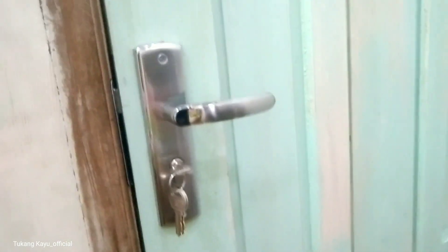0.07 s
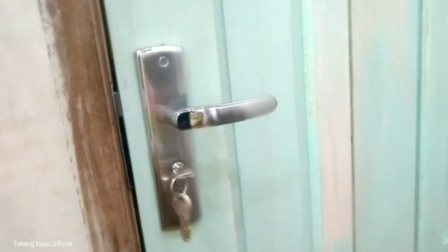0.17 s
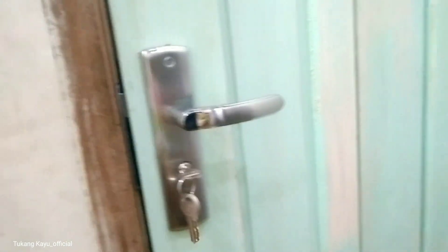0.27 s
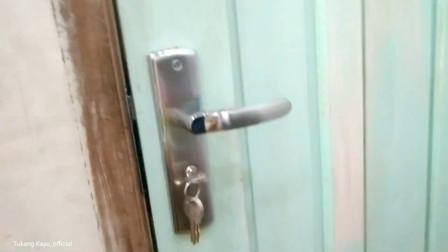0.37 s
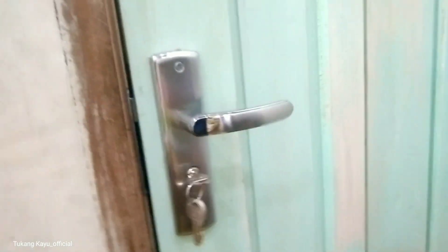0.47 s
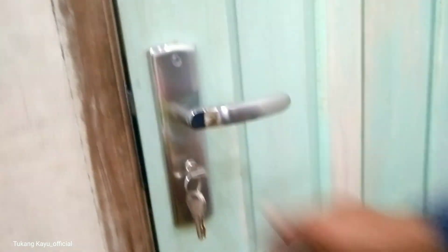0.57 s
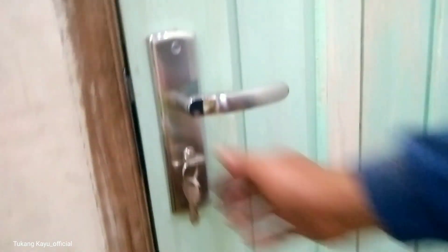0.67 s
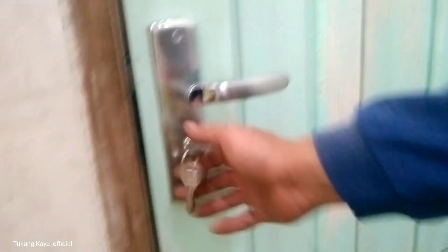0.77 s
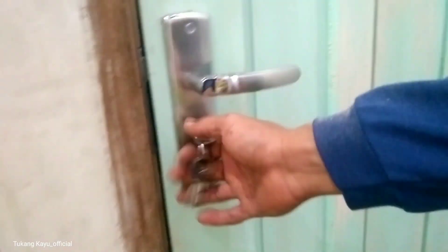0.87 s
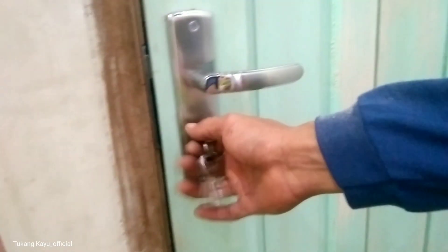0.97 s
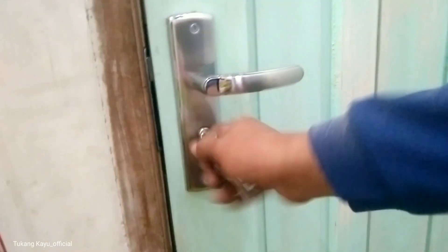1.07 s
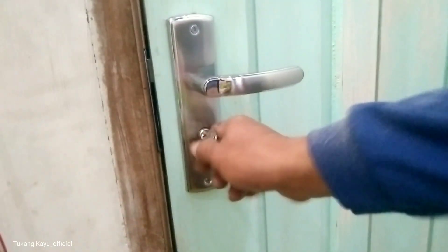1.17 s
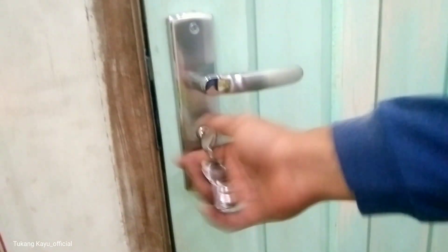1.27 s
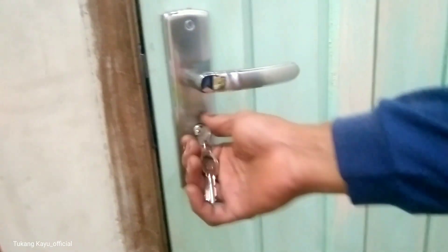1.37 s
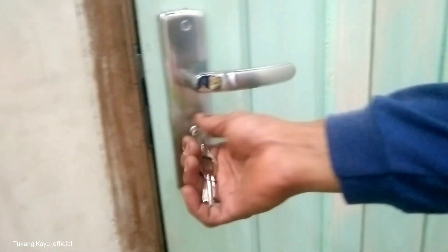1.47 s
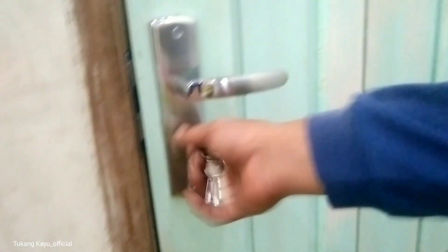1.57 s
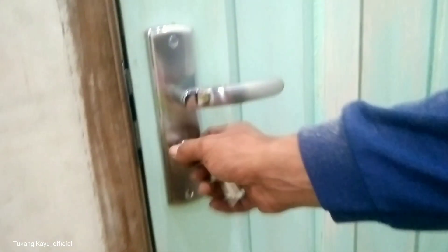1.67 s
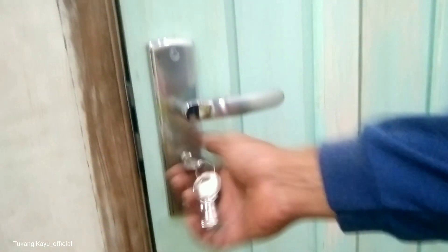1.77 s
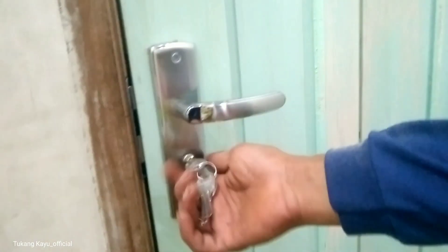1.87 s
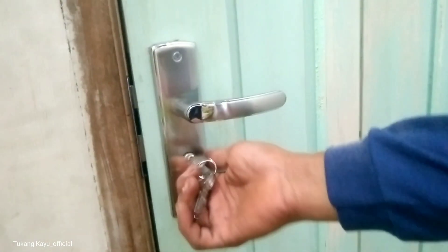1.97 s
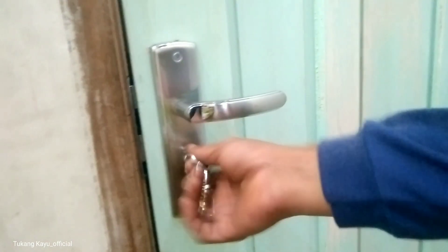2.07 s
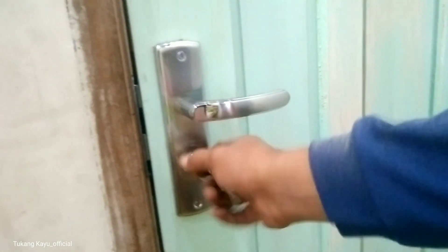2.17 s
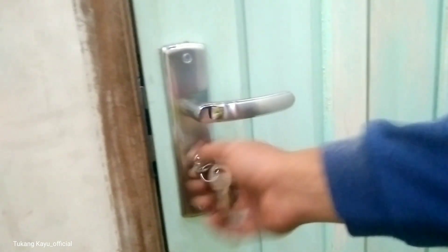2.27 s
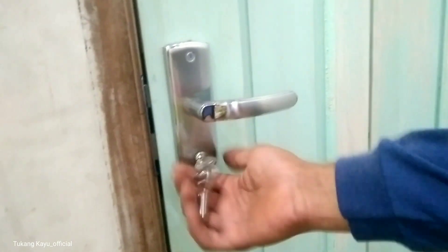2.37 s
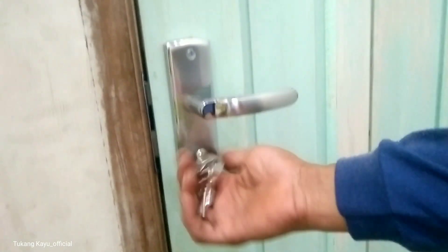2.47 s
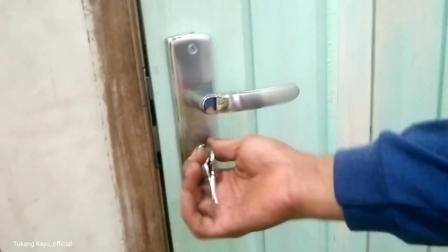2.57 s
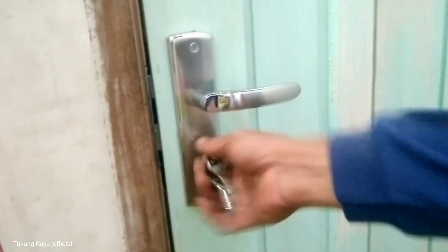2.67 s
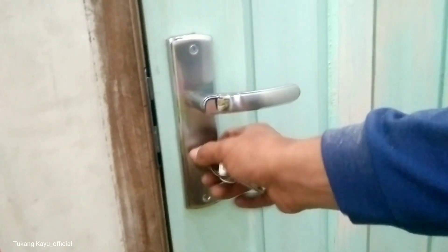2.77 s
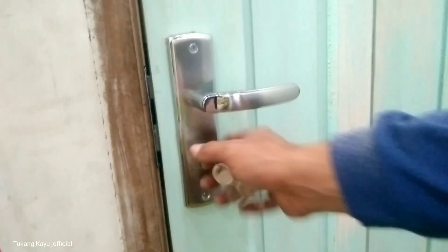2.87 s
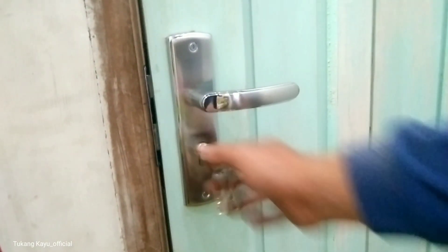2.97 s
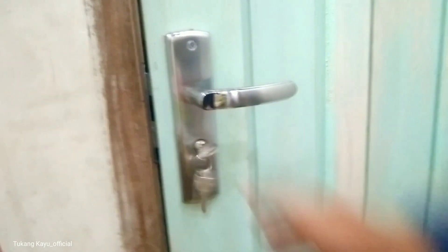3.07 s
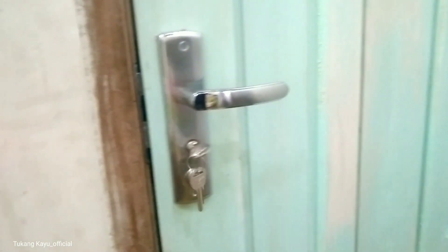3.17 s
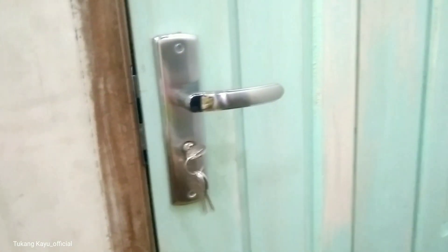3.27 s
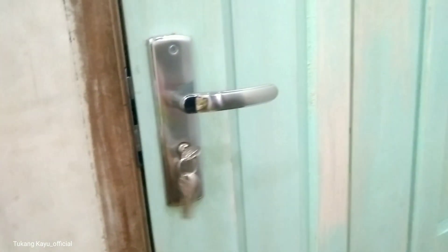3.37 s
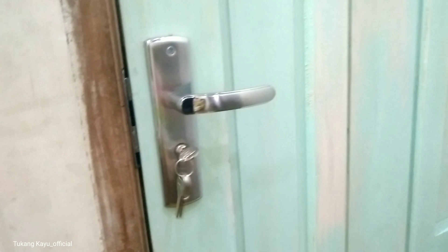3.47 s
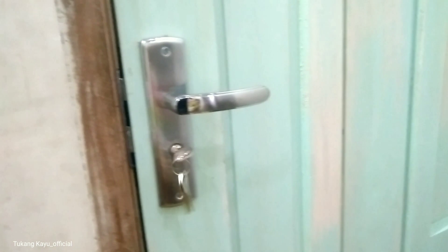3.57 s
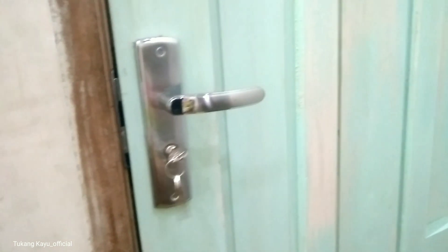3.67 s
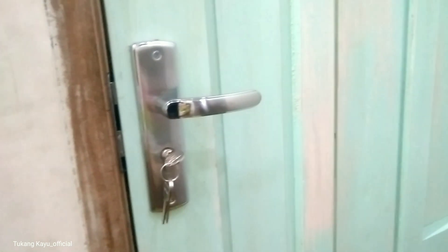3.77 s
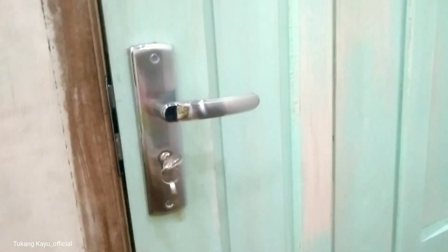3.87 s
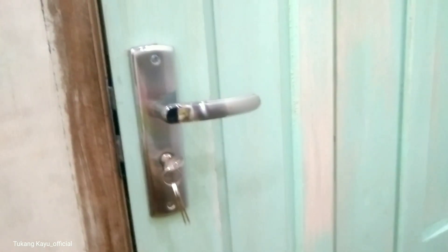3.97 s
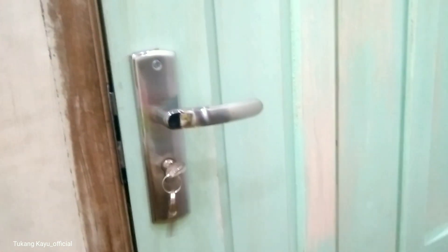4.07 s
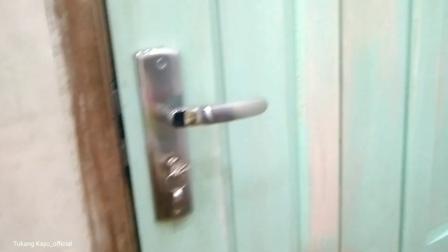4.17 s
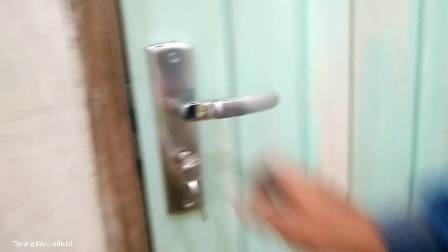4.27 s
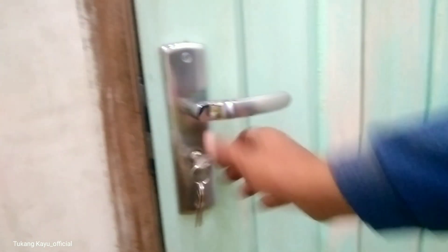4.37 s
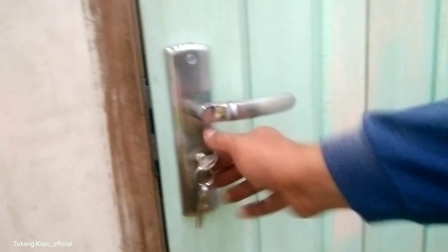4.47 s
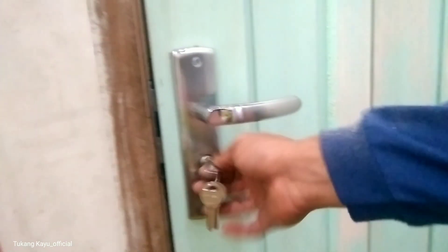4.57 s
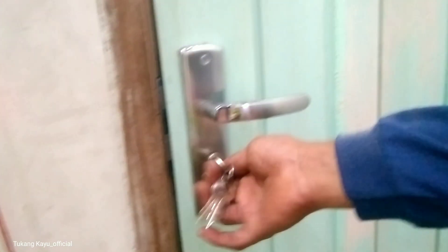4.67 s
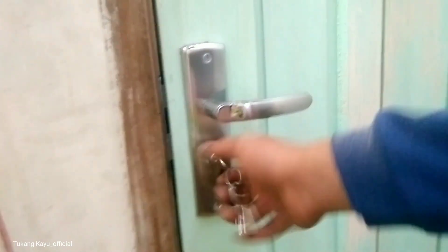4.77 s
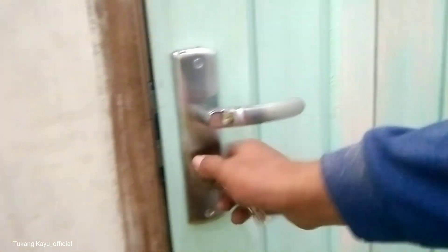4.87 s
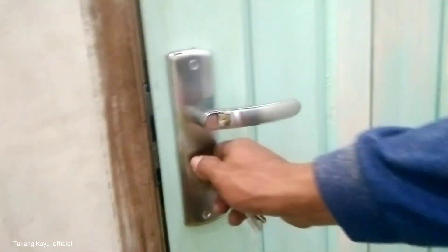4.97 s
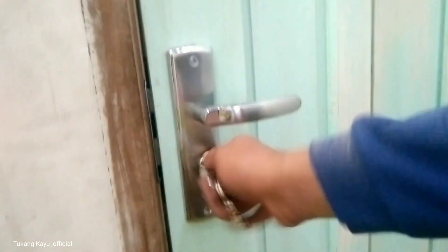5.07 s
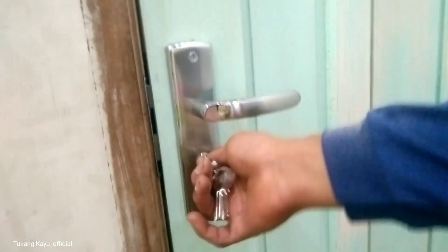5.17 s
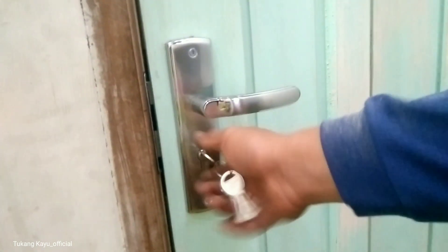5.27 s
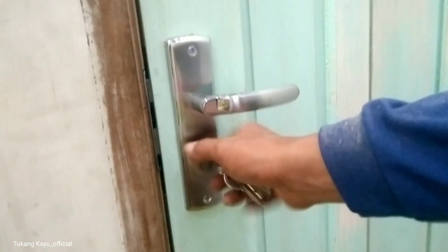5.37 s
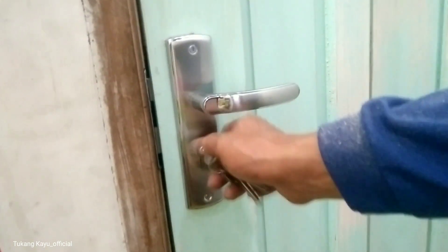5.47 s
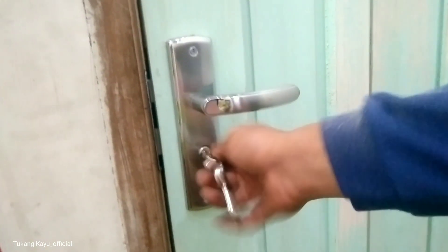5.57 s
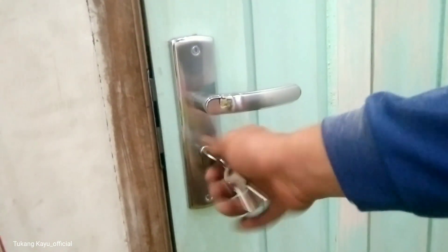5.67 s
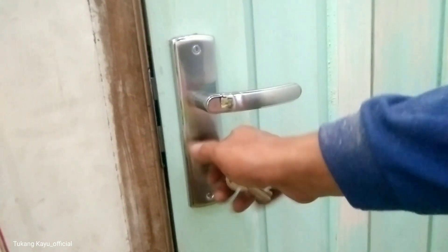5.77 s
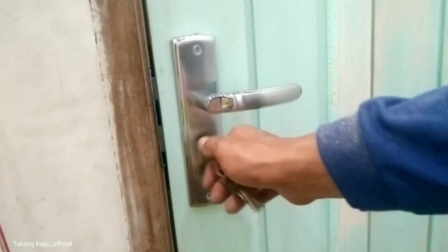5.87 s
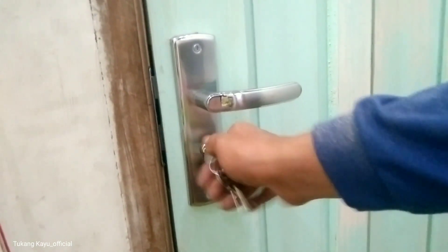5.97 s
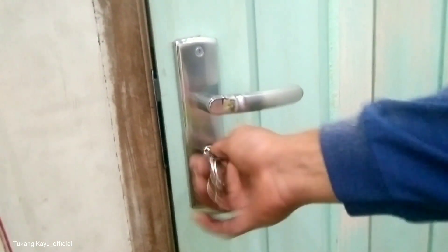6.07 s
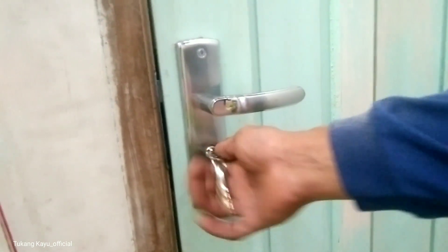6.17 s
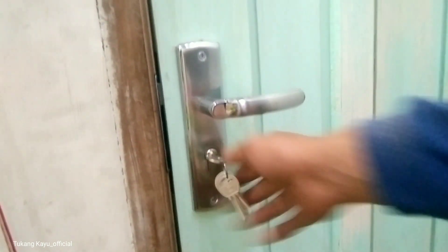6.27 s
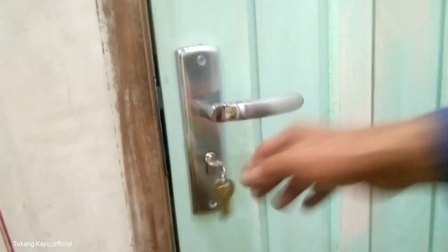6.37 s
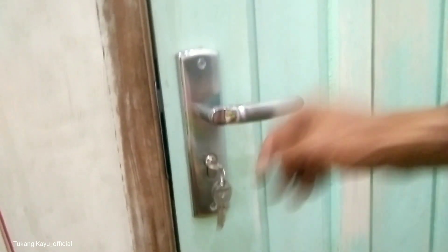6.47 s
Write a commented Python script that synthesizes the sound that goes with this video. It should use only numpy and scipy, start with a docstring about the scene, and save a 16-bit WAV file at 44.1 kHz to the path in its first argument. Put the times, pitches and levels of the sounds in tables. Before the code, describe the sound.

Close metallic clicks and key jingles as a door lock is turned four times, each bolt snapping with a hard clack in a small, echoing room.

```python
"""A low rumble, a wavering hum and a far motor are heard first, in a small hard room.
Close by, a key is turned four times in the lock of a wooden door: small parts tick and scrape as
bursts of tiny contacts, and the bolt snaps over with a resonant clack that thumps two door modes.
The spare keys chink on their ring as families of dying sines. One distant horn toots, a buzz of
harmonics with a narrow rasp."""
import sys
import numpy as np
from scipy import signal
from scipy.fft import rfft, irfft
from scipy.io import wavfile
from scipy.ndimage import uniform_filter1d

SR = 44100
rng = np.random.default_rng(int(sys.argv[2]) if len(sys.argv) > 2 else 0)


def unload_audio(sound):
    """Save the sound as a 16-bit wav file, at the path given as the first command line argument."""
    columns = np.transpose(np.atleast_2d(sound))
    # keep every value between -1 and 1, then stretch to whole-number steps
    steps = np.round(np.clip(columns, -1, 1) * 32767)
    wavfile.write(sys.argv[1], SR, steps.astype(np.int16))


N = 287973  # length in samples


def amp(db):
    """Decibels to gain."""
    return 10 ** (np.asarray(db) / 20)


def evened(x):
    """Scales to rms 1."""
    return x / np.sqrt(np.mean(x ** 2) + 1e-20)


def crested(x, size=160):
    """Scales so that the loudest few milliseconds have rms 1."""
    return x / np.sqrt(uniform_filter1d(x ** 2, size).max() + 1e-20)


def read(points, hz):
    """Reads a table on a log-frequency axis."""
    f, value = np.transpose(points)
    return np.interp(np.log(hz + 1), np.log(f), value)


def add(mix, s, sound):
    """Mixes a sound in at time s."""
    part = mix[max(round(s * SR), 0):][:len(sound)]
    part += sound[:len(part)]


def sine(hz, t):
    """A steady sine."""
    return np.sin(2 * np.pi * hz * t)


def phase(hz):
    """Phase of a tone whose pitch moves, in radians."""
    return 2 * np.pi * np.cumsum(hz) / SR


def band(x, hz, kind, order=4):
    """Low-pass or high-pass."""
    return signal.sosfilt(signal.butter(order, min(hz, SR / 2.1), kind, fs=SR, output="sos"), x)


def colour(x, points, size=2048):
    """Causal minimum-phase filter with the given spectrum, made by folding its cepstrum."""
    gain = amp(read(points, np.fft.rfftfreq(size, 1 / SR)))
    cepstrum = irfft(np.log(gain))
    cepstrum[1:size // 2] *= 2
    cepstrum[size // 2 + 1:] = 0
    response = irfft(np.exp(rfft(cepstrum)))
    return signal.fftconvolve(x, response)[:len(x)]


def drift(rate_hz):
    """Slow random motion of rms 1."""
    count = int(2 * rate_hz * N / SR) + 4
    return evened(np.interp(np.arange(N), np.linspace(0, N, count), rng.standard_normal(count)))


def patchy(x, spread_db=2.0):
    """Lets the level of each region of a noise, in time and pitch, wander on its own."""
    z = signal.stft(x, nperseg=1024)[2]
    patches = uniform_filter1d(rng.standard_normal(z.shape), size=4, axis=0)
    patches = evened(uniform_filter1d(patches, size=14, axis=1))
    return signal.istft(z * amp(spread_db * patches), nperseg=1024)[1][:N]


def ring(modes, t, scatter_db=0, damping=1, detune=0):
    """Dying sines; each blow can weight and bend them a little differently."""
    hz, db, t60 = np.transpose(modes)[:, :, None]
    level = amp(db + scatter_db * rng.standard_normal(hz.shape) - 60 * t * damping / t60)
    hz = hz * (1 + detune * rng.standard_normal(hz.shape))
    start_cycles = rng.random(hz.shape)
    return (level * np.sin(2 * np.pi * (hz * t + start_cycles))).sum(0)


def resonant(x, *peaks):
    """Lifts each resonance (Hz, width Hz, dB) out of a sound and lets it ring."""
    for hz, width, db in peaks:
        b, a = signal.iirpeak(hz, hz / width, SR)
        x = x + (amp(db) - 1) * signal.lfilter(b, a, x)
    return x


def own_colour(x, spread_db=3.5, count=14):
    """Every small part has random resonances of its own."""
    hz, db = np.geomspace(500, 14000, count), spread_db * rng.standard_normal(count)
    return colour(x, np.column_stack([hz, db]), size=512)


def chatter(t, decay_s, rise_s=0.00059):
    """Metal meets metal in a quickly dying burst of tiny contacts, with an even spectrum."""
    envelope = np.exp(-t / max(decay_s, .0005)) * (1 - np.exp(-t / rise_s))
    z = rfft(rng.standard_normal(len(t)) * envelope)
    flat = irfft(z / (abs(z) + 1e-12), len(t))
    return evened(flat * envelope ** (1 / 4))  # the flattened burst needs only a mild gate


def slips(size, per_s, spread_db):
    """A random train of tiny catches, a few of them strong if the spread is above zero."""
    chance, strength, sign = rng.random((3, size))
    caught = chance < per_s / SR
    return caught * np.sign(sign - .5) * amp(spread_db * np.minimum(-np.log(strength + 1e-9), 3))


# Spectrum of the lock case and plate.
# Each row: frequency in Hz, filter gain in dB.
CASE_SPECTRUM = [(100, -18.5), (200, 5), (450, 5), (800, 6), (1300, 5), (1900, 6), (3000, 0), (4200, -7.5),
                 (5000, -11), (6000, -9), (7200, -12), (9300, -5.5), (12000, -15), (16000, -24.5)]


def through_case(force, body_db, bite_db, treble_db, scale):
    """Heavy parts give the body of the sound, the plate its bite, the light parts its treble."""
    sound = colour(force, CASE_SPECTRUM)
    upper = band(sound, 2594, "high")
    body, bite, treble = band(sound, 3200, "low"), band(upper, 5260, "low"), band(upper, 5210, "high")
    return amp(body_db) * scale(body) + amp(bite_db) * scale(bite) + amp(treble_db) * scale(treble)


def crack(t, decay_s):
    """The very first hard contact, over in a millisecond or two."""
    contact = colour(chatter(t, decay_s, rise_s=.0002), CASE_SPECTRUM)
    return crested(band(contact, 4500, "high", order=2))


# What plate, handle and springs ring with.
# Each row: frequency in Hz, relative level in dB, t60 in seconds.
CASE_RINGING = [(705.4, 2, 0.2), (832, 0.5, 0.11), (1219, 6.5, 0.12), (1643, -4.5, 0.45), (1780, -1.5, 0.2),
                (1950, -9, 0.25), (2040, -11.5, 0.26), (2212, -18.5, .3), (2520, -8, 0.33),
                (2860, -8.5, 0.3), (3180, -7, 0.26), (3760, -6.5, 0.15), (3830, -4.5, 0.15),
                (5600, -2, 0.1), (8550, 8, 0.05), (9894, 0, 0.099)]


def case_ring(x):
    """Plate, handle and springs ring on faintly after every contact."""
    tail = ring(CASE_RINGING, np.arange(SR // 2) / SR)
    return x + amp(-19) * signal.fftconvolve(x, tail / np.linalg.norm(tail))[:N]


# Reverberation of the small hard room.
# Each row: frequency in Hz, t60 in seconds.
ROOM_DECAY = [(100, 1), (300, 0.9), (800, 0.88), (2000, 0.66), (4500, 0.59), (9000, 0.48), (15000, 0.41)]


def room(x, wet_db=-4, early_db=-6, early_decay_s=0.015):
    """Dense early echoes off door and frame, then a tail that dies band by band."""
    t = np.arange(SR) / SR
    taps = rng.choice([-1., 1.], SR) * (rng.random(SR) < 5000 / SR)  # 5000 echoes a second
    taps = taps * np.clip((t - .004) / 0.0037, 0, 1)
    hz, at, z = signal.stft(taps, SR, nperseg=256)
    fade = amp(-60 * at / read(ROOM_DECAY, hz)[:, None])
    tail = signal.istft(z * fade, SR, nperseg=256)[1][:SR]
    early = rng.permutation(taps) * np.exp(-t / early_decay_s) * (t > .003)
    echoes = amp(wet_db) * tail / np.linalg.norm(tail) + amp(early_db) * early / np.linalg.norm(early)
    return x + signal.fftconvolve(x, echoes)[:N]


# Spectrum of the background rumble.
# Each row: frequency in Hz, filter gain in dB.
RUMBLE_SPECTRUM = [(20, -33), (48, -25), (63, 0), (90, -3), (125, -5), (180, 0), (250, -7), (350, -7),
                   (450, -12), (700, -14), (1150, -22), (1400, -32), (1650, -48), (2300, -54), (16000, -58)]


def rumble(start_db=-59, swell_db=-0.97, ebb_db_per_s=0.5):
    """Low coloured noise with a patchy, unsteady level that slowly ebbs."""
    t = np.arange(N) / SR
    noise = colour(rng.standard_normal(N), RUMBLE_SPECTRUM, size=8192)
    return evened(patchy(noise)) * amp(start_db - ebb_db_per_s * t + swell_db * drift(5.3))


# Hum tones in the room; pitch and level waver about these values.
# Each row: frequency in Hz, level in dB.
HUM_TONES = [(109, -71), (186, -70.5), (306, -66), (371, -75.5), (549, -75.5)]


def hum():
    """A few sines, each wavering in level and pitch."""
    out = np.zeros(N)
    for hz, db in HUM_TONES:
        level_db = db + 1.6 * drift(2.4)
        out += amp(level_db) * np.sin(phase(hz + 2.3 * drift(6.6)))
    return out


# The far motor swells, slows and dies away; pitch and level waver about this path.
# Each row: time in seconds, pitch in Hz, level of the lowest tone in dB.
MOTOR_PATH = [(0, 193.5, -59.5), (0.568, 193, -61), (.68, 194.3, -53), (1, 187.9, -55), (1.799, 182.2, -59),
              (2.251, 177.8, -57.5)]
MOTOR_FADE_DB_PER_S = 32  # after the last row


def motor():
    """A drone of three locked sines that follows the motor's falling speed."""
    t = np.arange(N) / SR
    s, hz, db = np.transpose(MOTOR_PATH)
    angle = phase(np.interp(t, s, hz) + 2.2 * drift(15))
    fade_db = MOTOR_FADE_DB_PER_S * np.maximum(t - s[-1], 0)
    level_db = np.interp(t, s, db) - fade_db + 0.87 * drift(2.6)
    drone = np.sin(angle) + amp(-17) * np.sin(2 * angle) + amp(-14) * np.sin(2.86 * angle)
    return amp(level_db) * drone


# Clicks of pins, cam and spring.
# Each row: start in seconds, base level in dB (each band is offset from it),
# brightness as dB of treble over body, ring in Hz, high zing in Hz.
CLICK_EVENTS = [(0.996, -58, 11, 1850, 5660), (1.079, -49, 2.5, 2640, 11000),
                (1.144, -49.5, -13, 3060, 10840), (1.276, -40.5, 1, 2740, 5900),
                (1.348, -49.5, -2.5, 2670, 9900), (1.3643, -35.5, 11.5, 1740, 9860),
                (1.458, -52, -17, 1880, 5700), (1.511, -56, 4, 2900, 8600), (1.551, -54, -4, 2700, 5700),
                (1.633, -40, -6, 1800, 6060), (1.645, -50, -7, 1810, 8400), (1.725, -48, 8, 2900, 9500),
                (1.73, -40, 1, 3200, 8600), (1.754, -29.5, 12, 2900, 8600), (1.759, -30, -4, 3000, 8550),
                (1.797, -32.5, -9, 2010, 9800), (2.278, -29.5, 1, 2530, 7270),
                (2.301, -42, -17, 2430, 8600), (2.399, -47, -14, 2520, 8550), (2.526, -52, -11, 3040, 5650),
                (2.54, -40.5, -6, 3040, 5690), (2.56, -66, -24, 3040, 7050), (2.615, -49, -4, 1930, 7130),
                (2.628, -43.5, -17, 1940, 6090), (2.766, -37, -15, 1800, 10800),
                (2.811, -35.5, 3.5, 1910, 7040), (2.846, -43.5, -6, 3660, 8590),
                (2.884, -34, 3, 2990, 8800), (2.892, -33.5, -5, 2900, 5600), (2.919, -32, -6, 2790, 8700),
                (3.231, -41.5, -9, 1780, 5730), (3.311, -42, -18, 2870, 7300),
                (4.744, -43.5, -8, 2600, 6160), (4.797, -40, -11.5, 1850, 6070),
                (4.923, -49.5, -17, 2570, 8550), (5.14, -50, -13, 1820, 8550),
                (5.193, -60, -22, 1750, 7080), (5.273, -34, -1, 2870, 5600), (5.35, -28.5, -8, 2680, 8540),
                (5.711, -48, -5, 1900, 8600), (5.732, -38.5, 2, 3120, 8500), (5.756, -37, -9, 2380, 8630),
                (6.034, -45.5, -19, 1750, 5770), (6.086, -37.5, -5, 1750, 8700),
                (6.098, -36, -5, 1680, 8800), (6.105, -54, -11, 3050, 8800), (6.148, -39.5, -8, 3100, 9600),
                (6.192, -37.5, -8, 1900, 8200), (6.203, -53, -14, 1920, 8400), (6.239, -38, 15, 4000, 5900),
                (6.266, -40, -13, 2220, 5990), (6.277, -32, -14, 2450, 8550)]
CLICK_DECAY_S = 0.0053


def clicks(body_db=-11, bite_db=-7.5, edge_db=-11, crack_db=-13, crack_gain=0.62):
    """Small parts drop into place, each with its own ring; the lighter, the more treble and less body."""
    out, t = np.zeros(N), np.arange(4096) / SR
    for s, db, bright, ring_hz, zing_hz in CLICK_EVENTS:
        force = own_colour(chatter(t, CLICK_DECAY_S, rise_s=0.002), spread_db=5.0)
        force = resonant(force, (ring_hz, 220, 6), (zing_hz, 300, 9))
        body, edge = db + body_db - bright / 2, db + edge_db + bright / 2
        add(out, s, through_case(force, body, db + bite_db, edge, crested))
        add(out, s, amp(db + crack_db + crack_gain * bright) * crack(t, .001))
    return out


# What the key blades ring with.
# Each row: frequency in Hz, relative level in dB, t60 in seconds at damping 1.
KEY_RINGING = [(2620, -9, .18), (6070, 0, .36), (6990, -9, .12), (7090, -4, .18), (7185, 0, .15),
               (7310, -5, .14), (7400, -11, .12), (8590, -16, .1), (9230, -18, .1), (10290, -6, .16),
               (10370, -4, .16), (10505, -1, .19), (10730, -9, .18), (10835, -8, .2), (11770, -3, .2),
               (11890, -3, .16), (11990, -2, .16), (12090, -1, .15), (15420, -13, .18)]
# Borders between the low, middle, high and top family of those modes, in Hz.
FAMILY_BORDERS = [6500, 8000, 11300]
# The keys chink.
# Each row: start in seconds, level in dB of the low, middle, high and top family (four columns),
# edge tick in dB, decay of the contact in seconds,
# damping (1 hanging free, more when muted by the hand; below 0.6 it counts as 0.6).
CHINK_EVENTS = [(1.0706, -59.5, -55, -50.5, -50, -45, 0.0017, 0.52),
                (1.186, -62.5, -53, -74, -72, -52.5, 0.012, 1.1),
                (2.153, -78, -69, -75, -75, -52, .002, 1.9), (2.175, -53, -33.5, -47, -47, -40, .0047, 2.2),
                (2.3373, -77, -51, -72, -56, -53, .002, 2.3),
                (2.716, -59, -38.5, -56, -47, -57, .002, 0.84),
                (2.738, -62, -49, -45, -40, -38.5, 0.002, 4.6),
                (2.807, -49, -39.5, -53, -57, -38.5, 0.0026, 2.3),
                (2.8388, -60, -49, -48, -43, -43, .0013, 5),
                (3.1764, -52.5, -50, -49, -40, -42, 0.0032, 1.6),
                (3.425, -76.5, -66, -66, -52.5, -60, 0.0025, 3.2),
                (3.5218, -58, -54, -50, -48, -50, 0.0016, 2.2),
                (4.826, -55.5, -50, -40.5, -59, -42.5, 0.0022, 1),
                (4.879, -55, -49, -44, -51, -42, 0.002, 3), (4.8973, -72, -47, -46, -47, -46.5, 0.011, 3.5),
                (4.9241, -56, -57, -53, -59, -45.5, 0.0044, 2.2),
                (5.058, -50, -41, -45, -40, -40.5, 0.0022, 7.5),
                (5.23, -82, -57, -71, -69, -56, 0.0022, 2.5), (5.249, -72, -56, -69, -70, -53, .002, 2.5),
                (5.509, -64, -45.5, -50, -47, -43.5, 0.0044, 4.7),
                (5.656, -78, -70, -56, -51, -70, 0.0018, 2.6),
                (5.7803, -72, -60, -61, -60, -43.5, 0.0083, 6),
                (5.8121, -54, -43, -56, -62, -40, 0.0018, 7.8), (5.827, -69, -56, -64, -59, -41, .0016, 6),
                (5.962, -64, -60, -55, -54, -58, .002, 3.4), (6.017, -75, -52, -65, -67, -65, 0.0025, 4),
                (6.5197, -58, -54, -46, -43, -48, .002, 1.5)]
# one key slides along another just before they chink: seconds ahead, dB re the loudest family
BRUSH_S, BRUSH_DB = 0.0072, -14.5


def keys(low_free_db=-5, free_db=-13, touch_s=0.013, rattle_db=-10, rattle_s=0.016):
    """A chink is a light brush, an edge tick, a brief rattle, and flat blades ringing, partly choked."""
    out, t = np.zeros(N), np.arange(16384) / SR
    modes = np.array(KEY_RINGING)
    family = np.digitize(modes[:, 0], FAMILY_BORDERS)
    edge_spectrum = [(1000, -5.5), (2700, -18), (5000, -20.0), (7000, -12.0),
                     (9000, -6.5), (11000, -4.5), (13000, -15), (15000, -4.0)]  # Hz, dB
    for s, *levels, tick_db, contact_s, damping in CHINK_EVENTS:
        for k, db in enumerate(levels):
            # neighbouring keys choke the blades; the lowest modes escape best
            free = amp(free_db if k else low_free_db)
            choke = (free + np.exp(-t / touch_s)) * (1 - np.exp(-t / 0.0012))
            blades = ring(modes[family == k], t, scatter_db=5, damping=max(damping, .6), detune=.004)
            add(out, s, amp(db) * crested(blades * choke))
        rattle = chatter(t, rattle_s) * rng.exponential(1, len(t))
        contacts = chatter(t, contact_s, rise_s=0.00084) + amp(rattle_db) * rattle
        add(out, s, amp(tick_db) * crested(colour(contacts, edge_spectrum)))
        brush = band(chatter(t, BRUSH_S, rise_s=.004), 8000, "high")
        add(out, s - BRUSH_S, amp(max(levels) + BRUSH_DB) * crested(brush))
    return out


# The keys shuffle as the fingers take hold or let go.
# Each row: start in seconds, end in seconds, base level in dB (single touches scatter below it).
SHUFFLE_SPANS = [(1.069, 1.217, -48.5), (2.553, 2.86, -51.5), (3.138, 3.319, -45.5), (4.755, 4.817, -53),
                 (4.82, 4.947, -45.5), (4.954, 5.249, -61.5), (5.509, 5.855, -52), (5.95, 6.134, -51)]


def shuffles(per_s=55, spread_db=1.0, damping=6, glint_db=-3):
    """Keys held in the hand touch lightly: choked pings, each with a glint of its own pitch."""
    out, t = np.zeros(N), np.arange(2048) / SR
    for start, end, db in SHUFFLE_SPANS:
        count = max(round((end - start) * per_s), 1)
        for place, size, pitch in rng.random((count, 3)):
            ping = evened(ring(KEY_RINGING[1:], t, scatter_db=5, damping=damping, detune=.015))
            glint = evened(sine(7500 + 7500 * pitch, t) * np.exp(-t / 0.0017))
            level_db = db - 7.0 + spread_db * min(-np.log(size + 1e-9), 2)
            add(out, start + place * (end - start), amp(level_db) * crested(ping + amp(glint_db) * glint))
    return out


# Turns of the key, each ending with the bolt snapping over; levels are bases that each layer offsets.
# Each row: fingers grip at seconds, snap at seconds, grinding in dB, clack in dB, bite and treble
# in dB re the clack (two columns), chatter decay in seconds, knock in Hz, ring in Hz,
# high zing in Hz, door thump in dB.
KEY_TURNS = [(1.28, 1.779, -67, -20, -7.5, 0.5, 0.012, 940, 2020, 9700, -48),
             (2.202, 2.926, -65.5, -22.5, -7.5, -2, 0.009, 1120, 2760, 8770, -34.5),
             (5.1, 5.3128, -69, -18, -13, 2, 0.0086, 670, 1880, 8300, -20.5),
             (5.548, 6.244, -63, -19.5, -6, 0, 0.0053, 735, 4000, 10300, -29)]
# the bolt spring tightens before the snap: grinding grows by so many dB, with this time constant
SPRING_LOAD_DB, SPRING_LOAD_S = 26.5, 0.034


def slides(per_s=350, loaded_per_s=5000, spread_db=4.5, grind_db=-3, bite_db=-8, fizz_db=-16):
    """The turning key slips in clumps of ticks, which merge into a hard grind as the spring tightens."""
    out = np.zeros(N)
    judder = amp(6.5 * np.clip(drift(47), -1.5, 1.5))
    for grip, snap, db, *_ in KEY_TURNS:
        t = np.arange(grip, snap, 1 / SR)
        load = np.exp((t - snap) / SPRING_LOAD_S)
        grind, rate = db + SPRING_LOAD_DB * load, per_s + loaded_per_s * load
        catches = slips(len(t), rate, spread_db) / np.sqrt(rate)  # denser ticks, same power
        force = signal.fftconvolve(catches, chatter(t[:512] - grip, .0015))[:len(t)]
        sound = through_case(force, grind + grind_db, grind + bite_db, db + fizz_db, evened)
        add(out, grip, sound * signal.windows.tukey(len(t), .03))
    return out * judder


def pins(count=6, body_db=3, bite_db=1, edge_db=-5, spread_db=2.0, decay_s=0.0058):
    """Faint pin ticks, spread unevenly over each turn; a turn that grinds harder has stronger ticks."""
    out, t = np.zeros(N), np.arange(4096) / SR
    for grip, snap, db, *_ in KEY_TURNS:
        for k in range(count):
            s = grip + (snap - grip) * (k + rng.random()) / count
            level = db + spread_db * rng.standard_normal()
            tick = own_colour(chatter(t, decay_s))
            add(out, s, through_case(tick, level + body_db, level + bite_db, level + edge_db, crested))
    return out


# The key drags in the cylinder.
# Each row: start in seconds, length in seconds, base level in dB, treble in dB re that.
SCRAPE_EVENTS = [(1.741, 0.033, -42, -14.5), (2.217, 0.035, -47, -19), (2.261, 0.028, -46.5, -5),
                 (2.522, 0.045, -52, -28), (2.701, 0.066, -50, -4), (4.745, 0.049, -53.5, -27),
                 (4.871, 0.058, -54.5, -19), (5.277, 0.0316, -42.5, -15), (5.709, 0.047, -48, -3),
                 (6.081, 0.032, -53, -10), (6.192, 0.02, -43, -13)]
# the dragging key sings in the cylinder
SCRAPE_HZ, SCRAPE_WIDTH_HZ, SCRAPE_RING_DB = 2550, 500, 6


def scrapes(per_s=900, body_db=-3, bite_db=-2):
    """A short drag: slips at random moments that swell and fade."""
    out, t = np.zeros(N), np.arange(8192) / SR
    for s, length, db, treble in SCRAPE_EVENTS:
        stroke = np.sqrt(np.maximum(np.sin(np.pi * np.minimum(t / length, 1)), 0))
        force = own_colour(slips(len(t), per_s, spread_db=0.0))
        force = resonant(force, (SCRAPE_HZ, SCRAPE_WIDTH_HZ, SCRAPE_RING_DB))
        add(out, s, through_case(force * stroke, db + body_db, db + bite_db, db + treble, crested))
    return out


REBOUND_S, REBOUND_DB = .006, -6  # delay after the stop, level re the clack


def bolt(body_db=-10, bite_db=0.0, edge_db=-5, travel_db=-12, travel_s=0.0027, crack_db=-6):
    """The sprung bolt scrapes along its guide, hits its stop and rebounds; each turn resonates its own way."""
    out, t = np.zeros(N), np.arange(4096) / SR
    for _, s, _, db, bite, treble, decay, knock_hz, ring_hz, zing_hz, _ in KEY_TURNS:
        body, plate, edge = db + body_db, db + bite + bite_db, db + treble + edge_db
        dull_edge = edge - 7
        peaks = (knock_hz, 130, 5), (ring_hz, 190, 6.0), (zing_hz, 400, 4)
        scrape = through_case(chatter(t, travel_s)[::-1], body, plate, dull_edge, crested)
        add(out, s - t[-1], amp(travel_db) * scrape)  # swells up to the stop
        add(out, s, through_case(resonant(chatter(t, decay), *peaks), body, plate, edge, crested))
        add(out, s, amp(db + treble + crack_db) * crack(t, 0.0013))
        # the rebound is heavier and duller
        rebound = through_case(resonant(chatter(t, 0.012), *peaks), body + 4, plate, dull_edge, crested)
        add(out, s + REBOUND_S, amp(REBOUND_DB) * rebound)
    return out


def door(thump_hz=224, flex_hz=178, boom_hz=108, thump_t60=0.075, boom_t60=0.58, boom_db=-40):
    """Each bolt throw thumps two modes of the wooden panel; a deep boom builds up after it."""
    out, t = np.zeros(N), np.arange(SR) / SR
    panel = sine(thump_hz, t) + amp(-3) * sine(flex_hz, t)
    for _, s, *_, thump_db in KEY_TURNS:
        thump = amp(thump_db - 3 - 60 * t / thump_t60) * (1 - np.exp(-t / 0.0069))
        add(out, s, thump * panel)
        boom = amp(boom_db - 60 * t / boom_t60) * (1 - np.exp(-t / 0.048))
        add(out, s, boom * sine(boom_hz, t))
    return out


# The far horn, a single row: start in seconds, end in seconds, pitch in Hz (it wavers a little).
HORN_TOOT = (4.19, 4.36, 397.5)
# Its overtones.
# Each row: multiple of the pitch, relative level in dB.
HORN_OVERTONES = [(2, 1), (3, -2), (4, -5), (5, -10), (9, -23), (10, -22), (12, -20)]


def horn(db=-63, rasp_db=-3, rise_s=0.025, release_s=0.035):
    """A horn toots once far outside: a buzz of overtones with a narrow rasp, and strong echoes."""
    t = np.arange(N) / SR
    start, end, hz = HORN_TOOT
    angle = phase(hz + 3.5 * drift(55))
    buzz = sum(amp(level) * np.sin(k * angle) for k, level in HORN_OVERTONES)
    rasp = band(rng.standard_normal(N), 1780, "high", order=30)
    rasp = evened(band(rasp, 1900, "low", order=30))
    gate = np.clip((t - start) / rise_s, 0, 1) * np.exp(-np.maximum(t - end, 0) / release_s)
    toot = (buzz + amp(rasp_db) * rasp) * gate
    return amp(db) * crested(room(toot, wet_db=-6, early_db=-3))


def scene():
    """Bolt, lock works and keys sound in the room, over the background."""
    background = rumble() + hum() + motor()
    works = room(case_ring(clicks() + pins() + slides() + scrapes()), wet_db=-4.5, early_db=-5.5)
    jangle = room(keys() + shuffles(), wet_db=-9.5, early_db=-5.5)
    clacks = room(case_ring(bolt()), wet_db=-8.5, early_db=-8.5)
    close_by = band(clacks + works + jangle + door(), 52, "high", order=2)
    return (close_by + background + horn())[None]


EDGE_HZ = 15650  # top of the audible band


def record(dry):
    """A steep linear-phase low-pass takes off the extreme treble."""
    lowpass = signal.firwin(401, EDGE_HZ, window=("kaiser", 9), fs=SR)
    return signal.oaconvolve(dry, lowpass[None], "same")


dry = scene()
out = record(dry)
unload_audio(out)
```